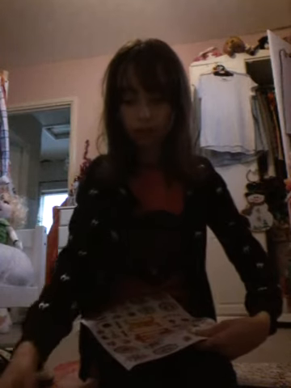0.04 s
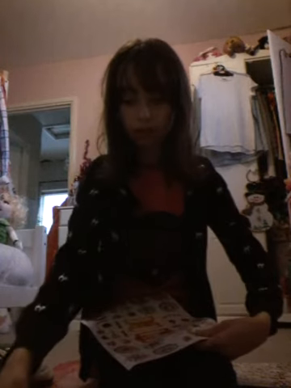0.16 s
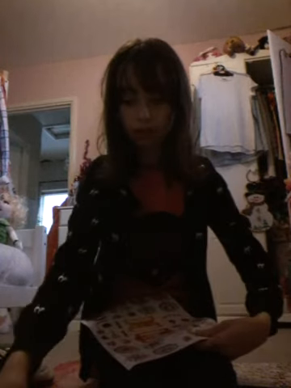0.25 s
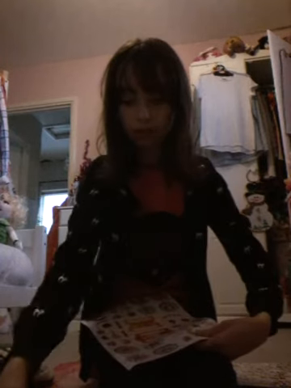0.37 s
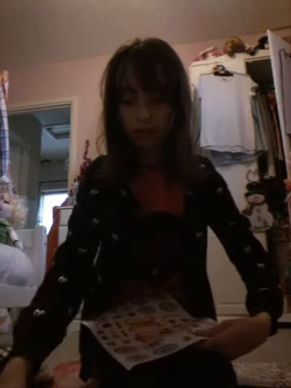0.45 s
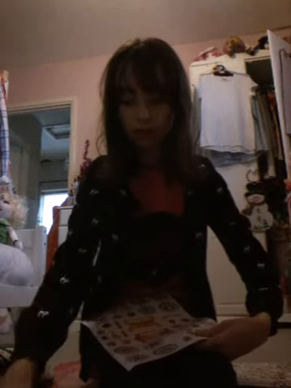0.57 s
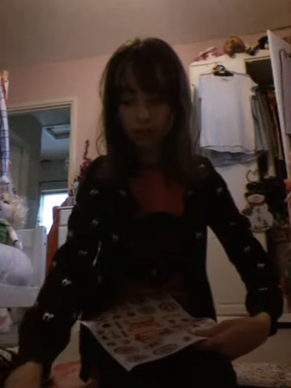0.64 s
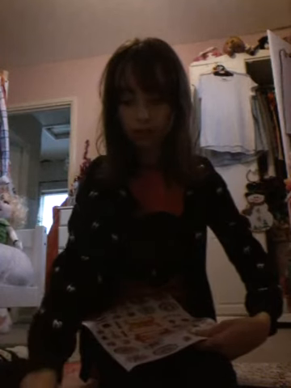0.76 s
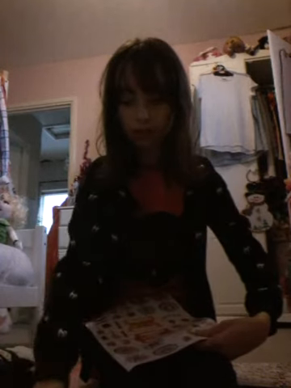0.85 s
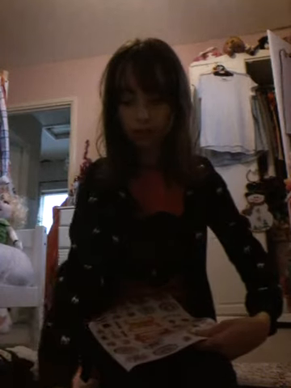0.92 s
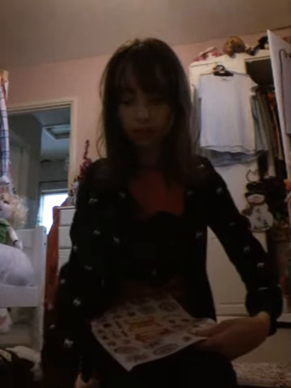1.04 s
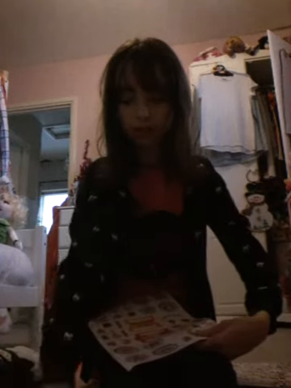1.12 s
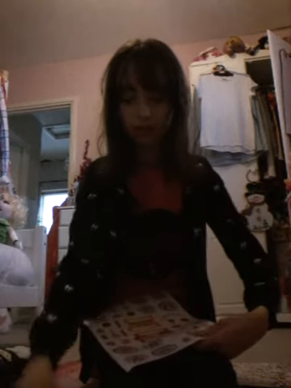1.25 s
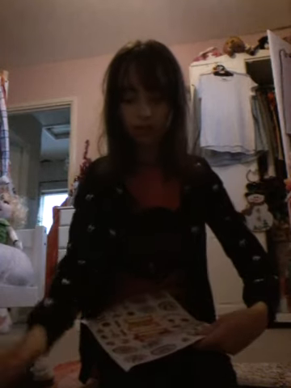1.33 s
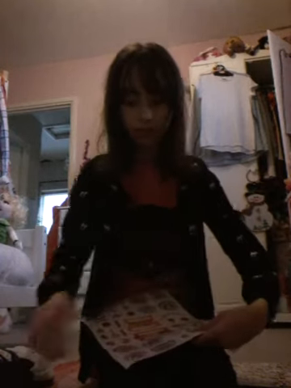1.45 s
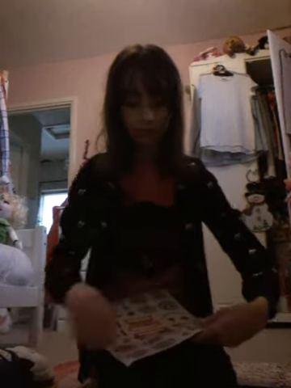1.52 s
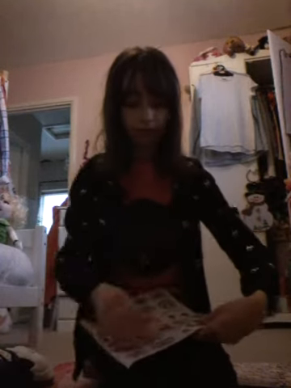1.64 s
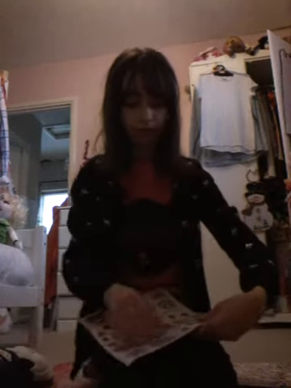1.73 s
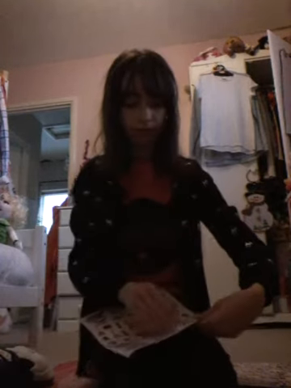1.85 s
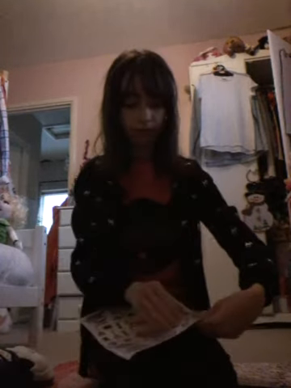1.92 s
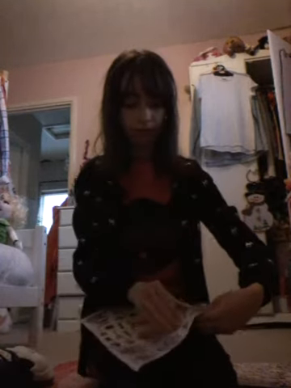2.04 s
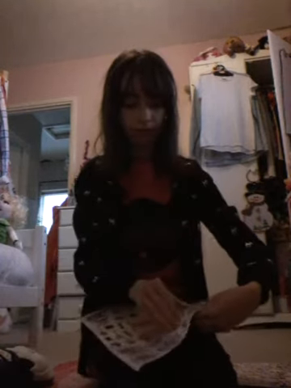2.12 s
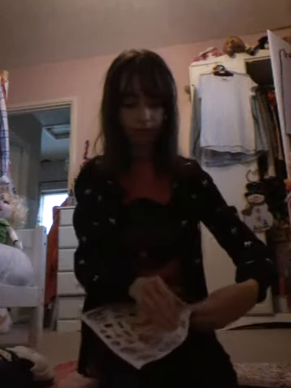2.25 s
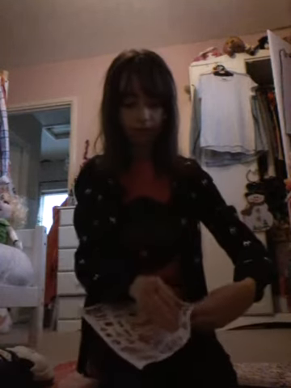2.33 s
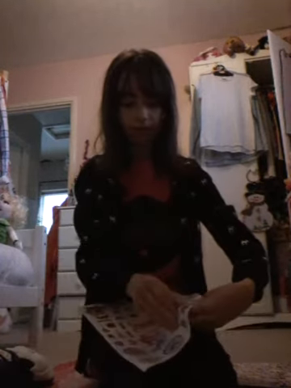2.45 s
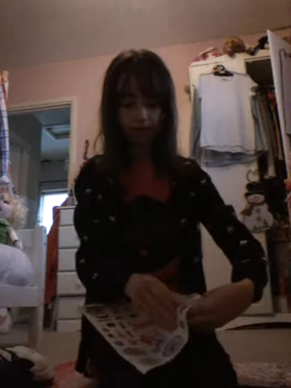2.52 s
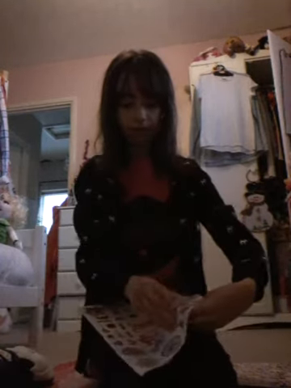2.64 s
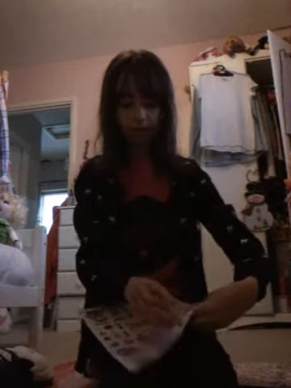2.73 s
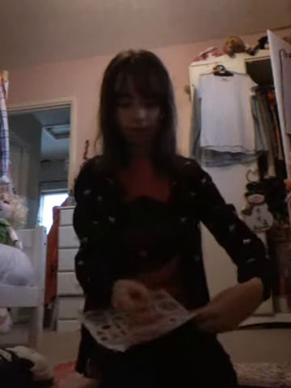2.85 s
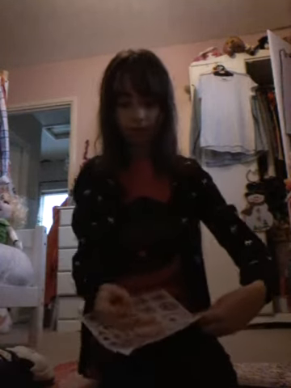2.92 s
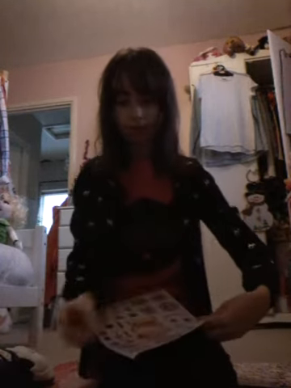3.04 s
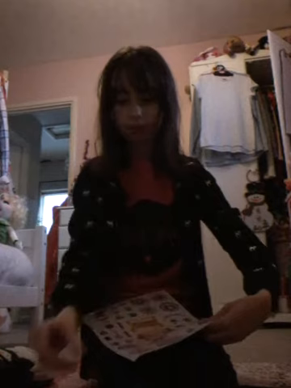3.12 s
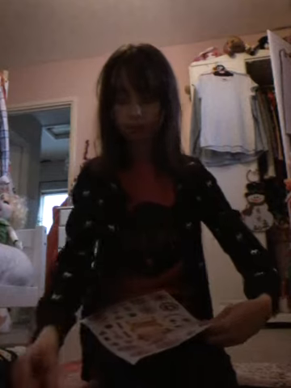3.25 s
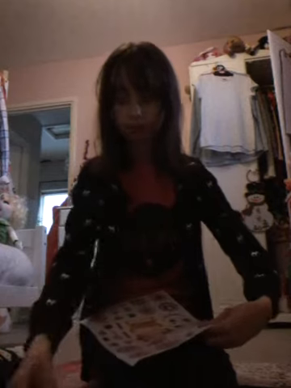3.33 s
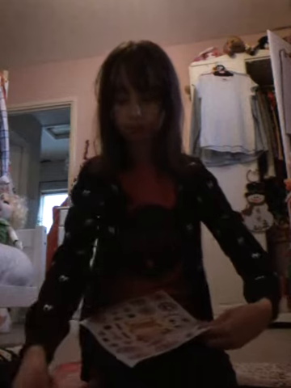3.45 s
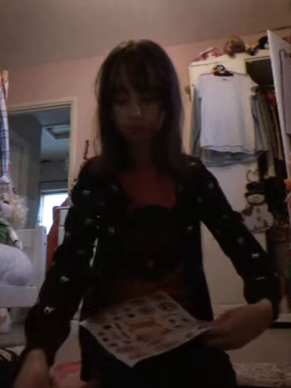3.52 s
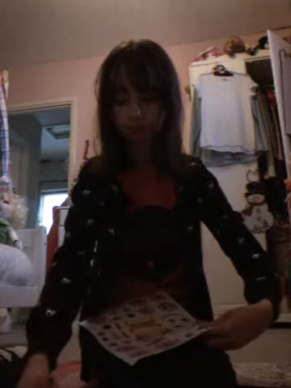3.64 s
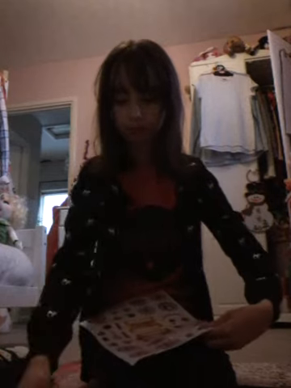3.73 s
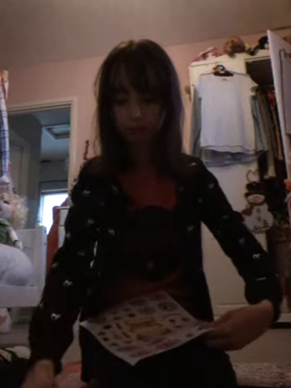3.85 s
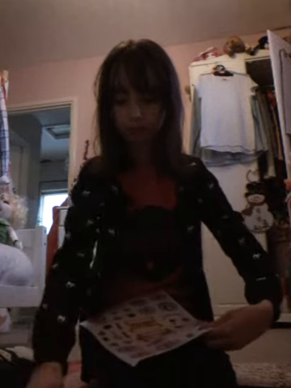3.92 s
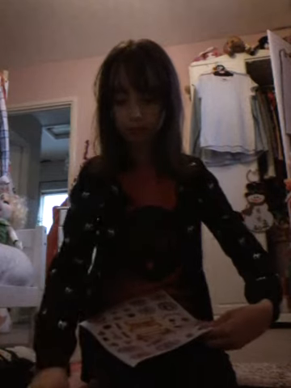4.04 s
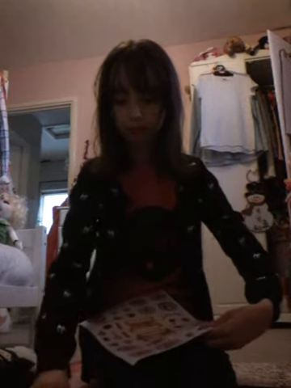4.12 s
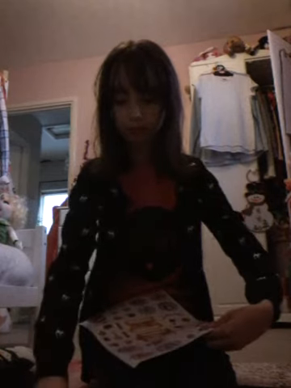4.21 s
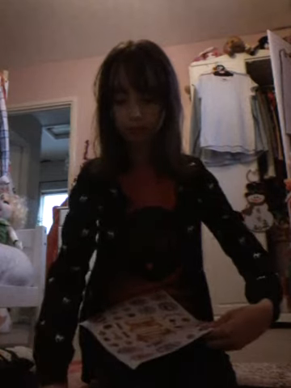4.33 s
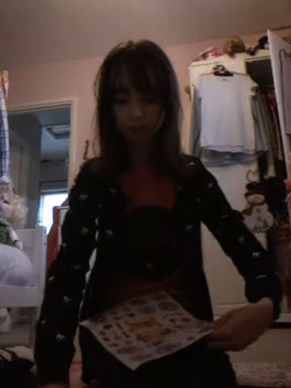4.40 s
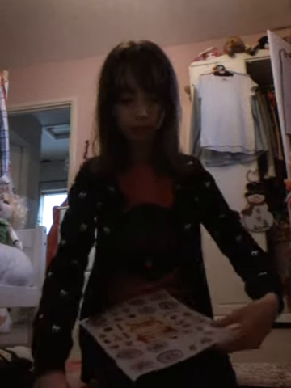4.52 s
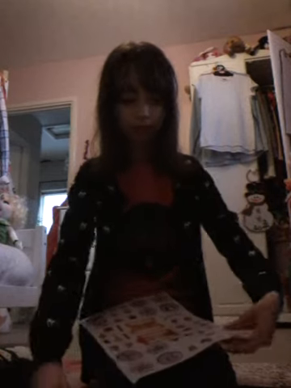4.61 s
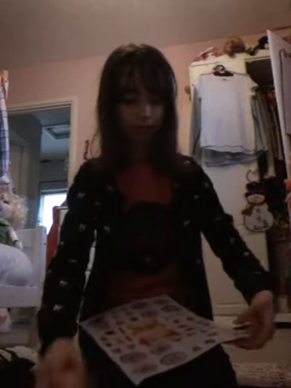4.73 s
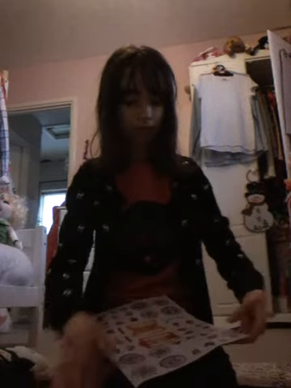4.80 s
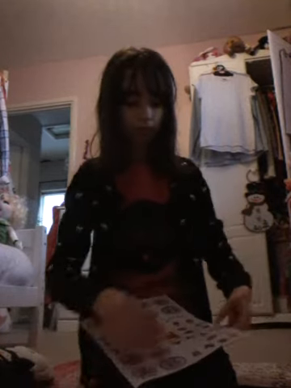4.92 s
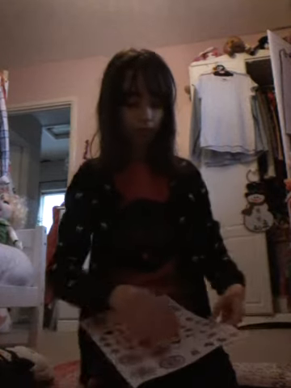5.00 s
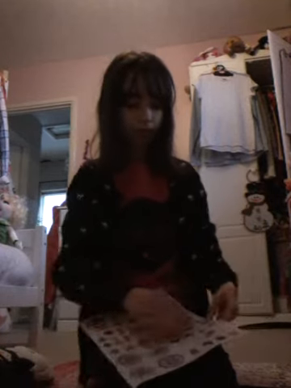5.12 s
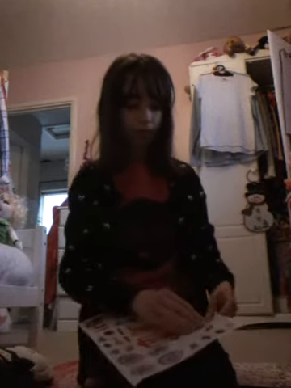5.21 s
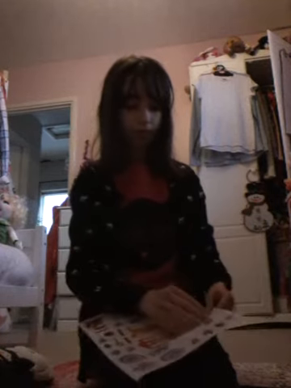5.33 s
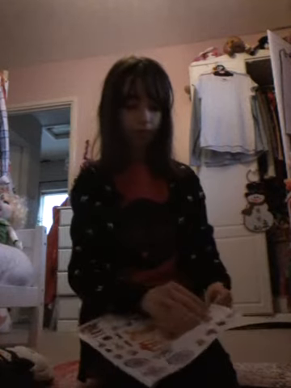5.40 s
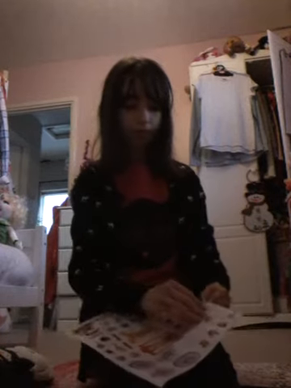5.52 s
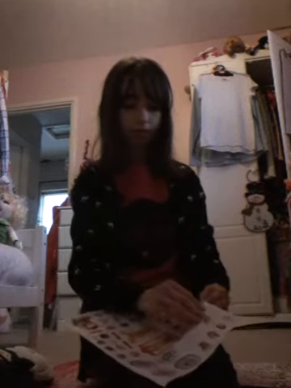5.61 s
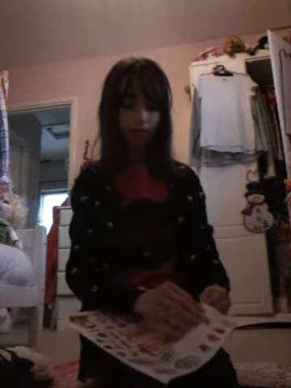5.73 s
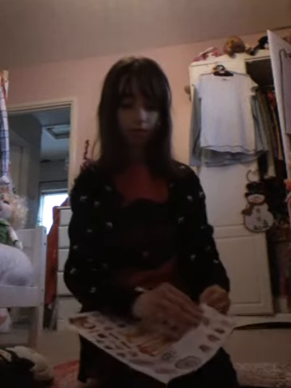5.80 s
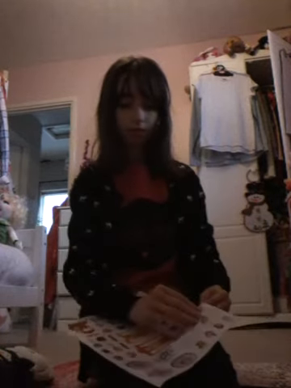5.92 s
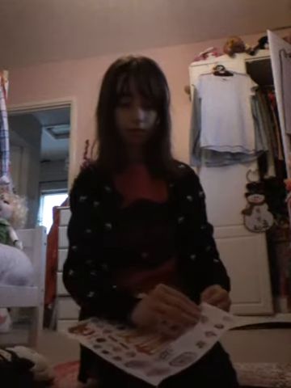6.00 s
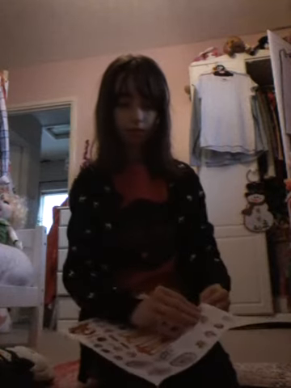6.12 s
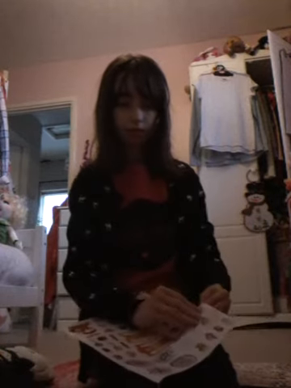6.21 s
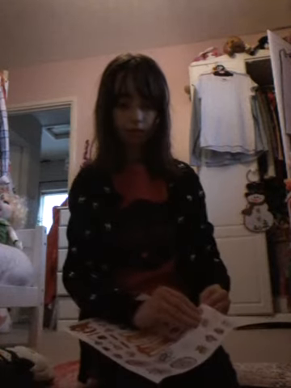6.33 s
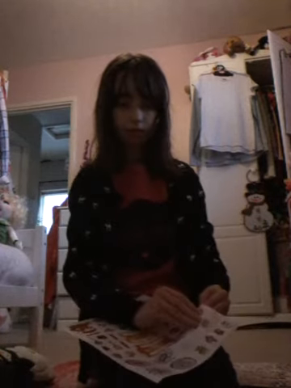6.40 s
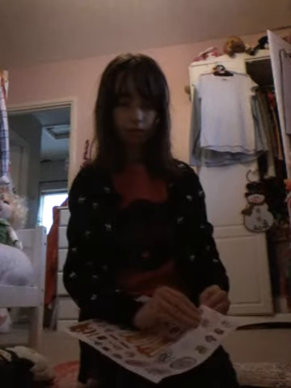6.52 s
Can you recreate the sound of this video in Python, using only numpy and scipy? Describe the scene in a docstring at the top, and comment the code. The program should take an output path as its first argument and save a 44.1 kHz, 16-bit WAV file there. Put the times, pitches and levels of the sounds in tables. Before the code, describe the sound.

Close, dry paper crackle and soft hand strokes on a sticker sheet, one loud pop near the middle, with a low machine hum behind.

```python
"""A stiff sheet of stickers is handled in a quiet room, close to a small mono microphone.
Hand and sleeve strokes drive a grainy friction hiss, flicked sticker edges and dull bending noise.
Creases tick and crinkle as short resonant pulses, a fingertip knocks as decaying low sines,
and a few times the whole sheet buckles with a sharp snap, a diffuse tail and ringing modes.
A machine hums in the house as wavering sine harmonics, over low room noise and hiss."""
import sys
import numpy as np
from scipy import signal
from scipy.fft import rfft, irfft, next_fast_len
from scipy.io import wavfile
from scipy.ndimage import uniform_filter1d, map_coordinates

SR = 44100
rng = np.random.default_rng(int(sys.argv[2]) if len(sys.argv) > 2 else 0)


def master(y):
    """Save y as 16-bit WAV."""
    cut = np.clip(np.atleast_2d(y).T, -1, 1)
    pcm = np.round(cut * 32767)  # scale
    wavfile.write(sys.argv[1], SR, pcm.astype(np.int16))


N = 289296
TIME = np.arange(N) / SR
COARSE_TIME = TIME[::32]  # slow curves are computed here, then interpolated
FIRM_DB = -55.5  # level of a firm stroke, against which the hand's effort is reckoned


def amp(db):
    """Decibels to gain."""
    return 10 ** (np.asarray(db) / 20)


def unit(x):
    """x at rms 1."""
    return x / np.sqrt(np.mean(x ** 2) + 1e-20)


def along(points, hz):
    """Gain at each frequency, joining (Hz, dB) points on a log frequency axis."""
    point_hz, point_db = np.transpose(points)
    return amp(np.interp(np.log(hz + 1), np.log(point_hz + 1), point_db))


def wobble(rate):
    """A smooth random curve, rate knots a second."""
    knots = rng.standard_normal(int(N * rate / SR) + 4)
    return np.interp(TIME, COARSE_TIME, map_coordinates(knots, [COARSE_TIME * rate]))


def coloured(x, points):
    """x filtered by the given spectral curve, at rms 1."""
    size = next_fast_len(len(x) + 8192)
    gain = along(points, np.fft.rfftfreq(size, 1 / SR))
    return unit(irfft(rfft(x, size) * gain, size)[:len(x)])


def add(track, s, sound):
    """Mix a sound into the track at time s, cut off at the track's end."""
    part = track[round(s * SR):][:len(sound)]
    part += sound[:len(part)]


def click(body_db, edge_db, centre_hz, width_hz, size=1024):
    """A sudden slip heard through one broad treble resonance, with body and sharp edge: peak 1."""
    body_curve = [(60, -14.5), (650, -10.5), (1100, 2.0), (1700, -3.0), (2600, -1.5), (6000, -21), (12000, -55.5)]
    skirt_curve = [(100, -19.5), (1500, 2.5), (4000, 2.5), (5700, -1.5), (8500, -24.5), (14000, -16.0)]
    hz = np.fft.rfftfreq(size, 1 / SR)
    resonance = hz * width_hz / np.abs(centre_hz ** 2 - hz ** 2 + 1j * hz * width_hz)
    skirts = along(skirt_curve, hz)
    body = amp(body_db - 5.0) * along(body_curve, hz)
    edge = amp(edge_db - 7.0) * along([(1000, -28), (6000, 10.5), (14000, -3)], hz)
    power = resonance ** 2 * skirts ** 2 + body ** 2 + edge ** 2
    # folding the cepstrum gives the causal, minimum-phase pulse with this spectrum
    cepstrum = irfft(np.log(power) / 2)
    cepstrum[1:size // 2] *= 2
    cepstrum[size // 2 + 1:] = 0
    pulse = irfft(np.exp(rfft(cepstrum)))
    return pulse / np.abs(pulse).max()


def stutter(db, t60=0.019):
    """A crease gives way in steps: the first slip, then smaller ones for a few milliseconds."""
    t = np.arange(SR // 50) / SR
    slips = rng.standard_normal(len(t)) * amp(-60 * t / t60) * (t > .0006)
    steps = amp(db) * slips / np.linalg.norm(slips)
    steps[0] = 1
    return steps


def answer(tail_db, hold, t60, colour):
    """The direct sound, near reflections and a diffuse tail that holds briefly (s), then dies."""
    # near surfaces: delay_s, level_db (relative to the diffuse tail's total)
    walls = [(.003, -9.5), (0.012, -15.5)]
    t = np.arange(SR // 4) / SR
    time_past_hold = np.logaddexp(0, (t - hold) * 200) / 200  # soft corner
    fade = amp(-60 * time_past_hold / t60) * (1 - np.exp(-t / .0006))
    tail = coloured(rng.standard_normal(len(t)), colour) * fade
    tail /= np.linalg.norm(tail)
    for delay, db in walls:
        add(tail, delay, amp([db]))
    response = amp(tail_db) * tail
    response[0] += 1  # direct sound
    return response


def house():
    """A slightly unsteady machine hum of shaft harmonics, low room noise and microphone hiss."""
    # hum lines: multiple of the shaft speed, peak level_db (before it wavers)
    hum_lines = [(2, -81), (3, -69), (4, -68.5), (5, -73), (7, -64), (9, -72), (10, -79), (11, -66),
                 (12, -68.5), (13, -80.5), (14, -72), (15, -81.5), (18, -88)]
    # room noise and hiss spectra: frequency_hz, relative level_db
    rumble_curve = [(15, -39), (32, -22), (43, -4.5), (70, 1), (160, -3), (280, -6), (400, -8.5),
                    (600, -9.5), (1000, -14.5), (2000, -21.5), (5000, -27)]
    hiss_curve = [(100, -12), (1000, 2.5), (3000, 2), (4400, -3), (5600, 0), (8000, -1), (14500, -1)]
    shaft_hz = 20.95
    turns = np.cumsum(shaft_hz * (1 + 0.0041 * wobble(4))) / SR
    hum = np.zeros(N)
    for order, db in hum_lines:
        level = amp(db + 1.6 * wobble(4.4))
        phase = 2 * np.pi * (round(order) * turns + rng.random()) + 0.43 * wobble(9.0)
        hum += level * np.sin(phase)
    rumble = amp(-67.5) * coloured(rng.standard_normal(N), rumble_curve)
    hiss = amp(-68.0) * coloured(rng.standard_normal(N), hiss_curve)
    return hum + rumble + hiss


def hand_speed():
    """Strokes set in, gather speed and ease off: gains of the rubbing and of the bending pressure."""
    # a hand or sleeve slides over the paper:
    # start_s, length_s, level_db (aimed at by the stroke's end), swish_db (pressure relative to rubbing)
    strokes = [(0.316, 0.076, -69, -9), (.58, 0.15, -71, 2), (1.077, 0.13, -65.5, -2),
               (1.182, .16, -61, -0.5), (1.488, 0.14, -71, 1), (1.874, 0.15, -63.5, 0),
               (2.057, 0.052, -55, -0.5), (2.172, 0.18, -64.5, 1), (2.398, 0.1, -55.5, -1),
               (2.599, 0.064, -53.5, -1), (2.746, 0.062, -48.5, -1), (2.893, 0.29, -69, 4),
               (3.298, 0.091, -64.5, 4), (3.875, 0.11, -68.5, -2), (4.376, 0.23, -72.5, -8),
               (4.555, .11, -58, -4.5), (4.721, 0.082, -58, -5), (4.878, .14, -66, -1),
               (5.02, 0.13, -60.5, -3.5), (5.19, .1, -68.5, -5), (5.29, 0.32, -58, -3),
               (5.686, 0.2, -59, 3), (5.92, 0.094, -53, 1.5), (6.05, .08, -63, -1),
               (6.135, 0.045, -56.5, 2.5), (6.242, 0.042, -58.5, -3), (6.34, .15, -62, 1)]
    rise_s, fall_s, swell_db = 0.013, .014, 1
    holding_db = -76.5  # the holding hand never keeps quite still
    t = COARSE_TIME
    rubbing = pressing = amp(holding_db) ** 2
    for s, length, db, swish_db in strokes:
        rise = .5 + .5 * np.tanh((t - s) / rise_s / 2)
        fall = .5 + .5 * np.tanh((s + length - t) / fall_s / 2)
        progress = np.clip((t - s) / length, 0, 1)
        power = amp(db + swell_db * (progress - 1.0)) ** 2 * rise * fall
        rubbing = rubbing + power
        pressing = pressing + power * amp(swish_db) ** 2
    return [np.interp(TIME, t, np.sqrt(power)) for power in (rubbing, pressing)]


def sliding(speed, grains_per_s=500, scatter_db=1.0, grain_share=0.21):
    """Fibres catch and let go: a fine hiss with tiny clicks of uneven size, brighter when fast."""
    # friction and added treble spectra: frequency_hz, relative level_db
    slide_curve = [(300, -23), (900, -15), (1600, -12), (2400, -11), (3300, -8.5), (4400, 2), (5300, -6),
                   (7000, -20), (9000, -15.5), (14500, -24)]
    swipe_curve = [(1000, -24.5), (3500, -4.5), (5200, 1.5), (7000, 0), (9000, -14), (14500, -13)]
    sizes = amp(scatter_db * np.minimum(rng.exponential(size=N), 3))
    catches = (rng.random(N) < grains_per_s / SR) * rng.choice([-1, 1], N) * sizes
    # grain_share is a share of power
    friction = np.sqrt(grain_share) * unit(catches) + np.sqrt(1 - grain_share) * rng.standard_normal(N)
    brightness = amp(-7.5) * (speed / amp(FIRM_DB)) ** 0.33
    treble = brightness * coloured(rng.standard_normal(N), swipe_curve)
    unevenness = amp(1.3 * wobble(90) + 1.5 * wobble(18))
    return speed * unevenness * (coloured(friction, slide_curve) + treble)


def sticker_edges(speed, edges_per_s=24, firm_db=-43.5, scatter_db=2.5):
    """The moving hand flicks the edges of stickers at random, harder the faster it goes."""
    sizes = amp(firm_db + scatter_db * np.clip(rng.standard_normal(N), -2, 2))
    flicks = (rng.random(N) < edges_per_s / SR) * sizes
    effort = (speed / amp(FIRM_DB)) ** 0.81
    tick = np.convolve(click(body_db=-9, edge_db=-21.5, centre_hz=4400, width_hz=1350), stutter(db=-5))
    return signal.oaconvolve(flicks * effort, tick)[:N]


def bending(pressure, inertia_s=.09):
    """The sheet gives with a dull swish, and thrums on the lap when it swings as a whole."""
    # swish spectrum: frequency_hz, relative level_db
    swish_curve = [(50, -23), (110, -1), (220, 3.5), (350, 2), (480, -2.5), (650, -7), (950, -6.5),
                   (2000, -12.5), (5000, -40)]
    # the whole sheet swings against the lap: centre_s, spread_s, level_db (before a 4 dB cut)
    swings = [(1.28, .08, -60.5), (2.06, 0.055, -54.5), (2.44, 0.11, -58), (2.78, 0.087, -56)]
    thrum_curve = [(30, -35), (60, -3), (130, 2.0), (210, -1.0), (300, -8.0), (600, -25.5), (2000, -65)]
    effort = np.abs(uniform_filter1d(pressure, int(inertia_s * SR))) / amp(FIRM_DB)
    swish_level = amp(-63.0 + 2.34 * wobble(25)) * effort ** 0.64
    swish = swish_level * coloured(rng.standard_normal(N), swish_curve)
    swing = amp(-67.0) * effort ** 0.36
    for s, spread, db in swings:
        swing += amp(db - 4.0) * np.exp(-.5 * ((TIME - s) / spread) ** 2)
    thrum = swing * coloured(rng.standard_normal(N), thrum_curve)
    return swish + thrum


def crinkles(ticks_per_s=700):
    """Tiny creases give way in runs: each a swarm of ticks, every one with its own size and pitch."""
    # runs of ticks: centre_s, spread_s, level_db (typical tick, before a 3.5 dB lift and the room)
    runs = [(.62, 0.0036, -63), (1.23, 0.028, -67), (2.009, 0.0053, -49), (2.064, .007, -48),
            (2.733, .012, -53), (3.351, 0.015, -73), (5.725, 0.017, -58), (5.835, .014, -58),
            (5.949, .008, -46), (6.047, .004, -48.5), (6.175, .01, -63), (6.378, 0.015, -56.5)]
    track = np.zeros(N)
    for s, spread, db in runs:
        count = int(ticks_per_s * 4 * spread) + 1
        for when, size, pitch in rng.standard_normal((count, 3)):
            pitch_hz = 3400 * np.exp(.25 * pitch)
            tick = click(body_db=-10, edge_db=-36, centre_hz=pitch_hz, width_hz=580)
            add(track, s + spread * when, amp(db + 3.5 + 4.0 * size) * tick)
    room_curve = [(200, -1), (1500, 6.0), (8000, -16.0)]
    room = answer(tail_db=-13, hold=0.0033, t60=0.073, colour=room_curve)
    return signal.fftconvolve(track, room)[:N]


def creases():
    """Small ticks of creases and fingernails barely move the sheet, so they die sooner."""
    # ticks that stand out: start_s, level_db (before a 1 dB cut, stutter and room),
    # body_db, sharp edge_db (both before trims in click), pitch_hz, stutter_db
    ticks = [(.7074, -24.5, -12, -18.5, 4730, -26), (1.1882, -39.5, 1, -21, 3550, -8),
             (1.2465, -37.5, 1, -21, 4260, -1), (1.8934, -40.5, -3, -24, 4630, -2),
             (2.0888, -37.5, 5, -6, 4180, 3), (2.7008, -16.5, -30, -15.5, 4370, 0.5),
             (2.7122, -25, -16, -16.5, 3880, -7), (2.7292, -22, -19, -10.5, 3580, -7),
             (2.7893, -35, -18, -18, 4010, -2), (3.1422, -37, -6, -9, 4680, -7),
             (3.1501, -33, -25, -17.5, 5330, 2.5), (3.3287, -35.5, -23, -27, 4700, -4),
             (3.3545, -30.5, -17, -9, 3860, -4), (3.373, -37, -5, -13, 5200, -10),
             (3.647, -38, -11, -10.5, 4400, -11.5), (3.9544, -31.5, 3, -12, 4710, -5),
             (3.961, -29.5, -8, -9, 4630, 1), (4.0584, -47, -15, -19.5, 4630, -2),
             (5.126, -40, -19, -23, 4530, -3), (5.2592, -39.5, -6, -22, 4400, -9.5),
             (5.5158, -34.5, -17, -26, 4740, -7), (5.5666, -24.5, -9, -23, 3600, -11),
             (5.569, -32, -11, -27, 2900, -7), (5.6084, -34.5, -17, -27, 4110, -6),
             (5.706, -36.5, -6, -24, 4300, -1), (5.7397, -34.5, -8, -36, 4620, -5),
             (5.8005, -34.5, -8, -33, 4250, -11), (6.0388, -26.5, -27, -33, 4000, 0.5),
             (6.1657, -32.5, -8, -18, 4800, -7), (6.3586, -39.5, -7, -25, 4000, 0),
             (6.386, -34, -7, -28, 4200, -1), (6.4773, -38.5, -6, -24, 3760, -3.5)]
    room_curve = [(200, 17.5), (1200, -4), (4200, -8.5), (12000, -7)]
    track = np.zeros(N)
    for s, db, body_db, edge_db, pitch_hz, stutter_db in ticks:
        tick = np.convolve(click(body_db, edge_db, pitch_hz, width_hz=1140), stutter(stutter_db))
        room = answer(tail_db=-4, hold=0.0021, t60=0.09, colour=room_curve)
        add(track, s, amp(db - 1) * signal.fftconvolve(tick, room))
    return track


def knocks(t60=0.014):
    """Soft contact of a fingertip on the backed sheet gives only a few low cycles."""
    # knocks: start_s, level_db (at the start of the decay), pitch_hz
    taps = [(0.7083, -45, 476), (1.984, -49, 574), (3.9547, -48.5, 630), (5.957, -42.5, 350),
            (6.39, -45, 358)]
    track, t = np.zeros(N), np.arange(SR // 10) / SR
    for s, db, hz in taps:
        onset = 1 - np.exp(-t / 0.00016)
        add(track, s, amp(db - 60 * t / t60) * np.sin(2 * np.pi * hz * t) * onset)
    return track


def buckles():
    """The sheet snaps from one bend to the other and rings on."""
    # the whole sheet pops through: start_s, level_db (before stutter and room), body_db,
    # sharp edge_db (both before trims in click), ring_db (before trims below), pitch_hz, stutter_db
    snaps = [(1.995, -30.5, 2.5, -30, -1.5, 3600, 0.5), (2.0341, -15.5, -2.5, -50, -4, 4170, -3),
             (2.045, -27.5, 0, -36.5, -0.5, 3260, 0.5), (2.33, -20.5, 4.5, -35, -0.5, 3830, -3),
             (2.3837, -34, 3, -30, -12, 3600, -16), (2.4325, -3.5, -8, -25.5, -0.7, 4200, -21)]
    # ring of the sheet and its surroundings: frequency_hz, relative level_db, t60_s
    modes = [(1072, -1.5, 0.097), (1220, -5, 0.16), (1400, -9, .08), (1498, -2, 0.085), (1536, 0, 0.089),
             (1710, 5, 0.07), (4100, 7, 0.12), (4300, -3, 0.16), (4800, -2, 0.13)]
    # diffuse tail spectrum: frequency_hz, relative level_db
    tail_curve = [(150, -17.5), (600, 0), (780, -9), (1000, 4.5), (1250, 0.5), (1600, 5), (2200, -7),
                  (3200, -5.5), (4300, -12.5), (5300, -7), (7000, -2.5), (14000, -8.5)]
    track, t = np.zeros(N), np.arange(SR // 4) / SR
    for s, db, body_db, edge_db, ring_db, pitch_hz, stutter_db in snaps:
        snap = np.convolve(click(body_db, edge_db, pitch_hz, width_hz=980), stutter(stutter_db))
        room = answer(tail_db=ring_db - 6.0, hold=0.015, t60=0.14, colour=tail_curve)
        ring = np.zeros(len(t))
        for hz, mode_db, t60 in modes:
            decay = amp(mode_db + rng.normal(0, 1.3) - 60 * t / t60)
            ring += decay * np.sin(2 * np.pi * (hz * t + rng.random()))
        onset = 1 - np.exp(-t / 0.0035)
        add(track, s, amp(db) * signal.fftconvolve(snap, room))
        add(track, s, amp(db + ring_db - 30.0) * ring * onset)
    return track


def scene():
    """One hand movement drives the rubbing, the flicked edges and the bending; both channels are alike."""
    speed, pressure = hand_speed()
    stroked = sliding(speed) + sticker_edges(speed) + bending(pressure)
    struck = crinkles() + creases() + knocks() + buckles()
    mono = house() + stroked + struck
    return np.array([mono, mono])


def record(dry):
    """The recorder keeps nothing above its band limit and sits slightly off zero."""
    top_hz, offset = 14700, -.0002
    size = next_fast_len(N + 8192)
    passband = np.fft.rfftfreq(size, 1 / SR) < top_hz
    return irfft(rfft(dry, size) * passband, size)[:, :N] + offset


dry = scene()
out = record(dry)
master(out)
```